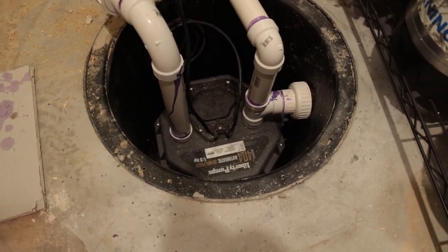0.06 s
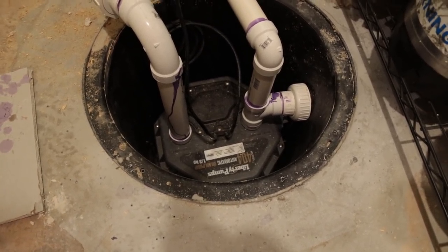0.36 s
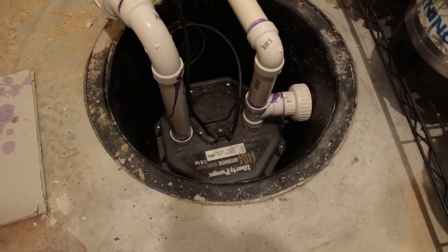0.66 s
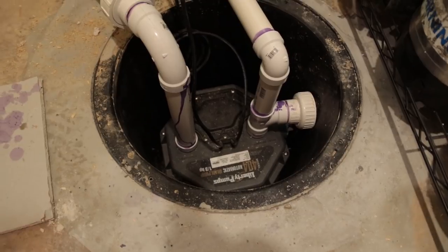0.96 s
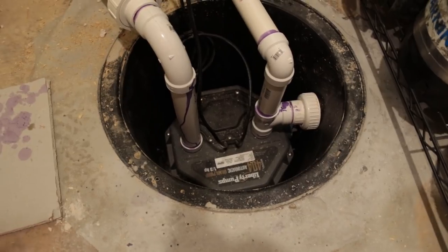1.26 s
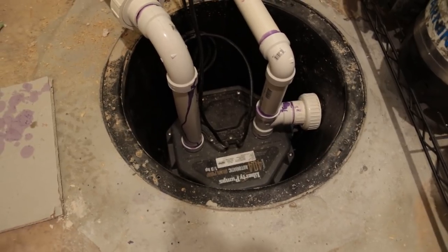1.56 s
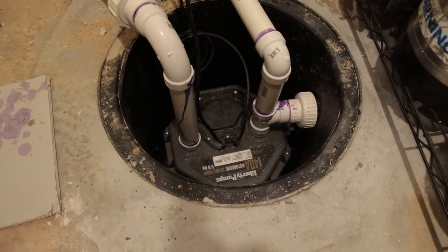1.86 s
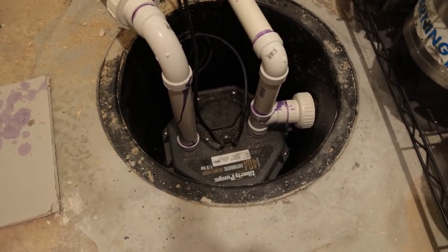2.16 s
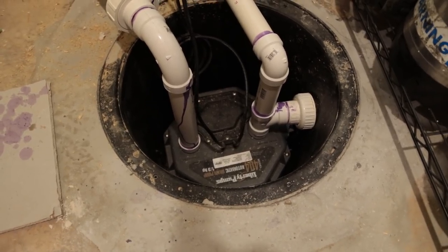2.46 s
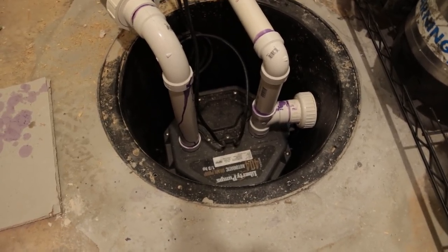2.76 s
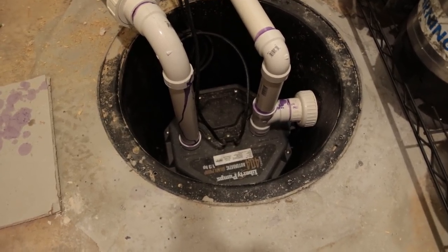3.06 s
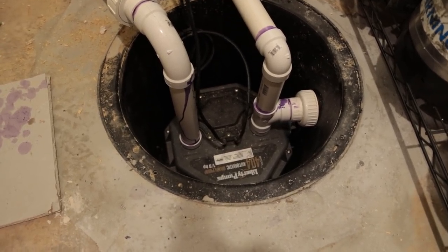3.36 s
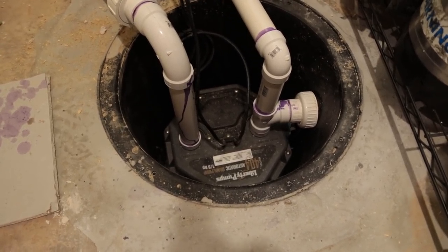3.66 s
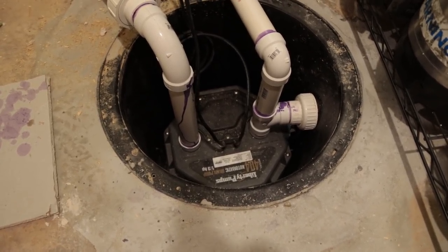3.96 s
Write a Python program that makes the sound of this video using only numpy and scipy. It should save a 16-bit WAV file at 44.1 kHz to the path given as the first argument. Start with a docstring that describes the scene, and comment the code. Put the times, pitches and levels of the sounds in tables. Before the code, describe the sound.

Water gushes into a sump basin with a splatter at about 0.1 seconds, over a pump's low hum and faint whine. By 0.8 seconds it settles into steady gurgling and churning, its hollow tone slowly rising. Small bubbles plop and drops tick on the wall, most often around 3 seconds. The hum grows slightly louder, and the splashing picks up near 4 seconds. The echo is short.

```python
"""Water filling a pump basin.

A submerged pump hums in a plastic basin in a basement floor. Water gushes in, then runs on steadily.
It churns, with a hollow resonance that climbs slowly. Bubbles ring as damped, rising sines: gurgle,
splash, spray, single plops. Flung drops tick on the wall. Basin and bare room echo bubbles and drops."""
import sys
import numpy as np
from scipy import signal
from scipy.fft import rfft, irfft, next_fast_len
from scipy.io import wavfile
from scipy.ndimage import map_coordinates

SR = 44100
rng = np.random.default_rng(int(sys.argv[2]) if len(sys.argv) > 2 else 0)


def master(y):
    """Save y as 16-bit WAV."""
    cut = np.clip(np.atleast_2d(y).T, -1, 1)
    pcm = np.round(cut * 32767)  # scale
    wavfile.write(sys.argv[1], SR, pcm.astype(np.int16))


N = 176400

# pump hum (time [s], level [dB])
HUM_LEVELS = [(0.0, -34), (0.12, -23), (0.6, -22.5), (1.5, -21.5), (2.4, -20.5), (3.2, -18), (4.0, -20)]
# thin pump tones (frequency [Hz], level [dB])
WHINE_TONES = [(340, -43), (466, -53), (646, -51.5), (872, -49), (996.5, -46), (1118, -43), (1448, -55),
               (1572, -61), (1780, -64), (3191, -63)]
# slosh in the basin (time [s], level [dB])
SLOSH_LEVELS = [(0.0, -42), (0.1, -32.9), (0.15, -33), (0.22, -22.5), (0.36, -28.5), (0.55, -32),
                (1.5, -33), (2.6, -32.5), (3.3, -29.5), (4.0, -27)]
# slosh spectrum (frequency [Hz], level [dB])
SLOSH_SPECTRUM = [(170, -16.5), (245, -3), (275, -1.5), (305, -4.5), (338, 1.5), (372, 0), (412, -20),
                  (600, -31)]
# water rumble (time [s], level [dB])
RUMBLE_LEVELS = [(0, -36), (.14, -36), (.3, -22), (.65, -29), (.9, -29), (2.4, -28.5), (3.4, -26.5),
                 (4, -27.5)]
# rumble spectrum (frequency [Hz], level [dB])
RUMBLE_SPECTRUM = [(20, -5), (48, -42), (62, 2.5), (72, -8.5), (87, 2.5), (105, 1.5), (140, 3), (180, -2),
                   (215, 0.5), (250, -16), (400, -24)]
# hollow resonance (time [s], centre [Hz], level [dB])
HOLLOW_TRACK = [(0, 130, -24), (.14, 140.2, -33), (.26, 138, -20.5), (.45, 140, -28.5), (1.2, 157, -29),
                (2.2, 176, -29.5), (3.2, 192, -27), (4, 213.4, -28)]
# falling water (time [s], gurgle [dB], splash [dB], spray [dB])
STREAM_LEVELS = [(.035, -41.5, -44, -57), (.07, -32, -32, -58), (.115, -31.5, -33, -50),
                 (.14, -24, -31, -37.5), (.2, -25, -29, -42), (.38, -26, -27.5, -34.5),
                 (.52, -29.5, -29.5, -36.5), (.82, -36, -36, -41), (1.3, -34.5, -36.5, -43.5),
                 (1.66, -34.5, -33, -40.5), (1.9, -34.5, -39, -42.5), (2.07, -33.5, -36.5, -41.5),
                 (2.35, -35, -40, -47), (2.75, -34.5, -41.5, -52.5), (3.0, -34.5, -38, -48),
                 (3.35, -33, -41.5, -52.5), (3.7, -34.5, -38.5, -52), (3.79, -30, -36.5, -46),
                 (3.9, -34, -36.5, -46.5), (4.0, -30.5, -32.5, -45)]
# gurgle spectrum (frequency [Hz], level [dB])
GURGLE_SPECTRUM = [(250, -25), (420, -4), (520, -0.5), (660, -4), (790, 7.5), (900, 2.5), (1100, -0.5),
                   (1350, -2), (1800, -11.5), (3000, -26)]
# splash spectrum (frequency [Hz], level [dB])
SPLASH_SPECTRUM = [(800, -46), (1500, -8), (2100, -5.5), (2600, -3), (3300, 4), (3900, 0.5), (4600, -6.5),
                   (6500, -17), (10000, -48)]
# spray spectrum (frequency [Hz], level [dB])
SPRAY_SPECTRUM = [(2800, -4), (4800, 1), (6500, -1), (9000, -4.5), (11500, -10), (13500, -16), (15500, -23)]
# first gush (time [s], level [dB])
GUSH_LEVELS = [(.03, -51), (.13, -26.5), (.3, -33.5), (.9, -58)]
# gush spectrum (frequency [Hz], level [dB])
GUSH_SPECTRUM = [(900, -14), (1600, -1.5), (2600, 5), (6500, -11)]
# foam spectrum (frequency [Hz], level [dB])
FIZZ_SPECTRUM = [(3000, -21), (9000, 7), (15500, -4)]
# big bubbles (time [s], pitch [Hz], relative level [dB])
PLOPS = [(.120, 883, -6), (.136, 2650, -8.5), (0.146, 324, -5), (0.151, 1730, -11), (0.240, 137.2, -5.5),
         (0.334, 2380, -12), (0.36, 2280, -12), (0.419, 515, -15.5), (.636, 2540, -11.5),
         (0.692, 970, -12.5), (0.769, 2880, -13.5), (.960, 3120, -13.5), (1.523, 3118, -13),
         (1.593, 3580, -16), (1.653, 1320, -13), (1.788, 2000, -14), (1.91, 970, -16.5), (2.149, 3700, -19),
         (2.187, 3400, -12), (2.311, 2200, -22), (2.482, 2400, -16.5), (2.576, 3350, -17.5),
         (2.794, 750, -19), (2.868, 2160, -23.5), (2.8934, 2700, -11.5), (2.926, 2540, -19),
         (2.941, 2330, -13), (2.946, 2930, -12.5), (2.985, 3230, -17.5), (3.035, 3160, -17),
         (3.062, 2570, -17), (3.098, 3200, -16.5), (3.139, 2530, -17.5), (3.156, 3180, -16.5),
         (3.272, 3360, -18.5), (3.359, 1170, -15.5), (3.766, 757, -12), (3.782, 1910, -17.5),
         (3.781, 3270, -16.5), (3.809, 3270, -16), (3.822, 1005, -18.5), (3.875, 840, -16),
         (3.984, 1840, -19.5)]
# drops on the wall (time [s], relative level [dB])
DROP_HITS = [(0.301, -22), (.962, -35), (1.493, -29.5), (2.017, -29), (2.48, -30), (2.575, -34),
             (2.75, -33), (2.800, -31), (2.825, -32), (2.942, -30.5), (3.595, -34), (3.686, -38),
             (3.741, -29)]
# tick spectrum (frequency [Hz], level [dB])
DROP_SPECTRUM = [(1500, -19), (3500, 8.5), (6000, -2), (9000, -2), (15500, -24)]

BASIN_T60_S, BASIN_DB, ROOM_T60_S, ROOM_DB, FIRST_ECHO_S = 0.054, -4, 0.17, -5.5, 0.0027
TIME_S = np.arange(N) / SR


def amp(db):
    """Decibels to gain."""
    return 10 ** (np.asarray(db) / 20)


def unit_rms(x):
    """Scale to rms 1."""
    return x / np.sqrt(np.mean(x ** 2) + 1e-20)


def decay(t, t60):
    """Exponential fall, 60 dB per t60."""
    return np.exp(-np.log(1000) * t / t60)


def curves(rows):
    """Each column after time, interpolated per sample."""
    times_s, *columns = np.transpose(rows)
    return [np.interp(TIME_S, times_s, column) for column in columns]


def wobble(rate_hz):
    """Smooth random curve, rate_hz knots a second."""
    return map_coordinates(rng.standard_normal(4000), [TIME_S * rate_hz], mode="wrap")


def filtered(x, response):
    """Apply a gain given as a function of Hz."""
    size = next_fast_len(N + SR // 2)
    return irfft(rfft(x, size) * response(np.fft.rfftfreq(size, 1 / SR)), size)[:N]


def coloured(x, spectrum):
    """Shape x by a spectrum, rolled off in the octave above its last point; rms 1."""
    points_hz, db = np.transpose(spectrum)
    log_hz = np.log(np.append(points_hz, 2 * points_hz[-1]))
    db = np.append(db, -120)
    return unit_rms(filtered(x, lambda hz: amp(np.interp(np.log(hz + 1), log_hz, db))))


def noise(spectrum):
    """Coloured noise; rms 1."""
    return coloured(rng.standard_normal(N), spectrum)


def add(track, start_s, x):
    """Mix x into track at start_s."""
    i = max(int(start_s * SR), 0)
    track[i:i + len(x)] += x[:len(track[i:])]


def pump(hum_hz=120, whine_fade_s=0.083):
    """Mains hum plus faint wavering tones."""
    hum_db, = curves(HUM_LEVELS)
    hum = amp(hum_db) * np.sin(2 * np.pi * hum_hz * TIME_S + .04 * wobble(5.6))
    whine = sum(amp(db + 0.29 * wobble(7.6)) * np.sin(2 * np.pi * hz * TIME_S + .5 * wobble(6.7))
                for hz, db in WHINE_TONES)
    return np.sqrt(2) * (hum + whine * np.minimum(TIME_S / whine_fade_s, 1))


def churning(hollow_width_hz=42):
    """Slosh and rumble in the basin; its hollow resonance is a climbing band of noise."""
    slosh_db, = curves(SLOSH_LEVELS)
    rumble_db, = curves(RUMBLE_LEVELS)
    centre_hz, hollow_db = curves(HOLLOW_TRACK)
    phase = 2 * np.pi * np.cumsum(centre_hz) / SR
    hollow = wobble(hollow_width_hz) * np.cos(phase) + wobble(hollow_width_hz) * np.sin(phase)
    return (amp(slosh_db) * noise(SLOSH_SPECTRUM)
            + amp(rumble_db) * noise(RUMBLE_SPECTRUM)
            + amp(hollow_db) * unit_rms(hollow))


def bubble(t, hz, cycles, rise=0.24):
    """Damped sine: over `cycles` periods it falls 60 dB and its pitch gains the fraction `rise`."""
    age = t * hz / cycles
    phase = 2 * np.pi * hz * t * (1 + rise * np.minimum(age, 2) / 2)
    attack = 1 - np.exp(-2 * t * hz)
    return np.sin(phase) * decay(age, 1) * attack


def echoed(x):
    """Direct sound plus short basin and longer room tails, drawn anew per call."""
    t = np.arange(SR // 3) / SR
    response = np.zeros(len(t))
    for t60_s, db in (BASIN_T60_S, BASIN_DB), (ROOM_T60_S, ROOM_DB):
        tail = rng.standard_normal(len(t)) * decay(t, t60_s) * (t > FIRST_ECHO_S)
        response += amp(db) * tail / np.linalg.norm(tail)
    response[0] = 1
    return signal.fftconvolve(x, response)


def swarm(low_hz, high_hz, cycles, spread_db, count, samples):
    """Echoing bubbles of random onset, pitch and strength; rms 1."""
    onset, pitch, strength = rng.random((count, 3)).T[:, :, None]
    offsets = np.arange(samples)
    hz = low_hz * (high_hz / low_hz) ** pitch
    level_db = -spread_db * np.log(strength * .98 + .02)
    rings = amp(level_db) * bubble(offsets / SR, hz, cycles)
    positions = (onset * N).astype(int) + offsets
    direct = np.bincount(positions.ravel(), rings.ravel(), N)[:N]
    wet, block = np.zeros(N), SR // 5
    for i in range(0, N, block):
        add(wet, i / SR, echoed(direct[i:i + block]))
    return unit_rms(wet)


def rush(level_db, spectrum, bubbles, wash_db, flutter_db, flutter_hz, merge_db_per_db=0.3):
    """Fluttering bubbles over a noise wash; stronger flow merges them into the wash."""
    wash_gain = amp(wash_db + merge_db_per_db * (level_db - np.median(level_db)))
    mix = (coloured(bubbles, spectrum) + wash_gain * noise(spectrum)) / np.hypot(1, wash_gain)
    flutter = amp(flutter_db * wobble(flutter_hz))
    return amp(level_db) * unit_rms(mix * flutter)


def stream():
    """Falling water: gurgle of larger bubbles, splash of small ones, fine dense spray."""
    gurgle_db, splash_db, spray_db = curves(STREAM_LEVELS)
    gurgle = swarm(low_hz=398, high_hz=1530, cycles=10.3, spread_db=0.9, count=1300, samples=1600)
    splash = swarm(low_hz=1530, high_hz=4730, cycles=20, spread_db=3.0, count=3000, samples=600)
    spray = swarm(low_hz=4080, high_hz=15500, cycles=16, spread_db=7, count=6000, samples=100)
    return (rush(gurgle_db, GURGLE_SPECTRUM, gurgle, wash_db=1, flutter_db=1.23, flutter_hz=18)
            + rush(splash_db, SPLASH_SPECTRUM, splash, wash_db=-4, flutter_db=1.5, flutter_hz=55)
            + rush(spray_db, SPRAY_SPECTRUM, spray, wash_db=0, flutter_db=0.65, flutter_hz=45))


def gush():
    """The first slug of water breaks on the surface in a dense splatter."""
    level_db, = curves(GUSH_LEVELS)
    splatter = swarm(low_hz=1040, high_hz=4800, cycles=6.4, spread_db=2.5, count=7000, samples=300)
    return amp(level_db) * coloured(splatter, GUSH_SPECTRUM)


def froth(landing_s=0.075, patter_db=-54.5, fizz_db=-56):
    """Once the water lands, tiny droplets ping over a steady fizz of foam."""
    patter = swarm(low_hz=3800, high_hz=12000, cycles=9, spread_db=3, count=380, samples=200)
    fade_in = np.clip(TIME_S / landing_s - .5, 0, 1)
    return fade_in * (amp(patter_db) * patter + amp(fizz_db) * noise(FIZZ_SPECTRUM))


def plops(gain_db=2.5, snap_db=-15.5):
    """Single big bubbles: a pinch-off snap and a short rising ring."""
    track, t = np.zeros(N), np.arange(SR // 10) / SR
    for start_s, hz, db in PLOPS:
        ring = bubble(t, hz, cycles=18)
        snap = amp(snap_db) * bubble(t, hz, cycles=2.1)
        add(track, start_s, echoed(amp(db + gain_db) * (ring + snap)))
    return track


def drops(t60_s=.012, gain_db=0.5):
    """Flung drops strike the basin wall, each a tick of noise."""
    track, t = np.zeros(N), np.arange(SR // 50) / SR
    for start_s, db in DROP_HITS:
        tick = rng.standard_normal(len(t)) * decay(t, t60_s)
        add(track, start_s, amp(db + gain_db) * echoed(tick))
    return np.std(track) * coloured(track, DROP_SPECTRUM)


def scene():
    """Pump and water from above the basin, mono."""
    return (pump() + churning() + stream() + gush() + froth() + plops() + drops())[None]


def record(dry):
    """Brick-wall low-pass."""
    cutoff_hz = 15720
    return filtered(dry[0], lambda hz: hz < cutoff_hz)[None]


dry = scene()
out = record(dry)
master(out)
```